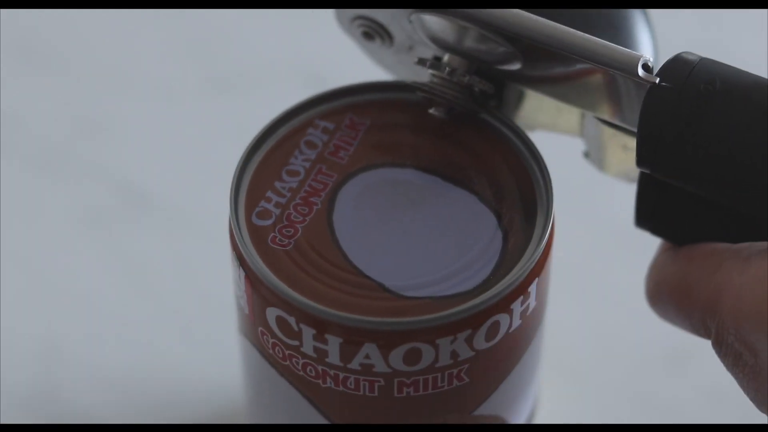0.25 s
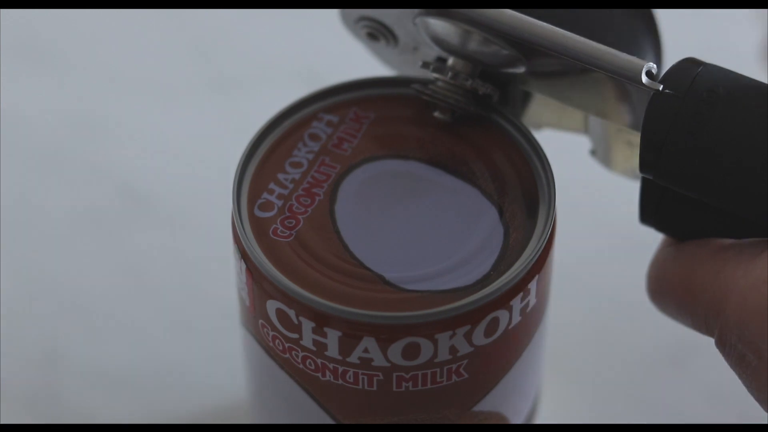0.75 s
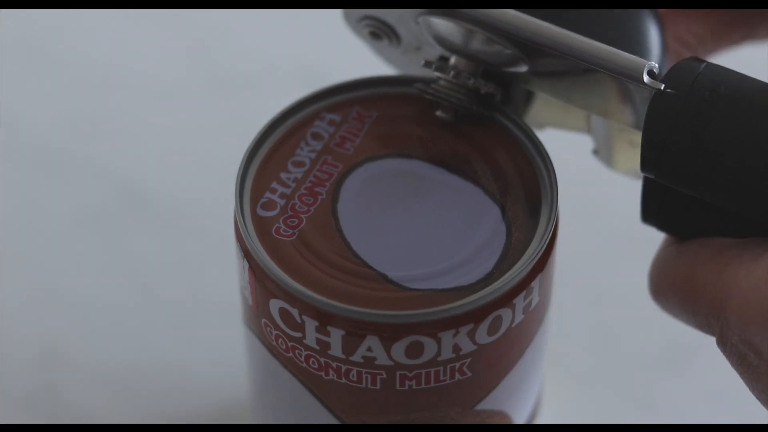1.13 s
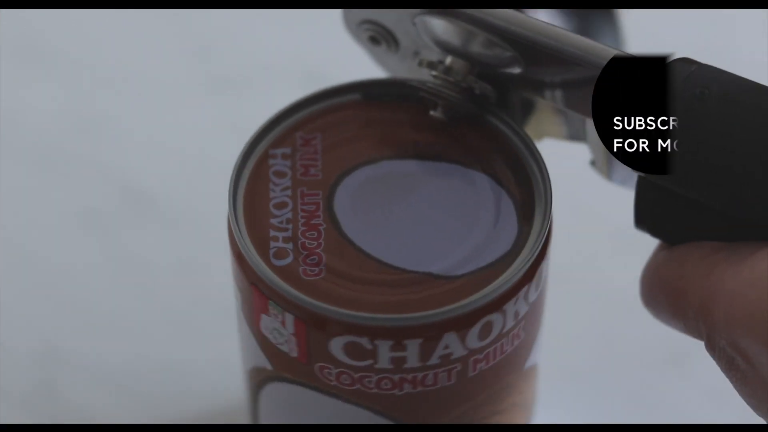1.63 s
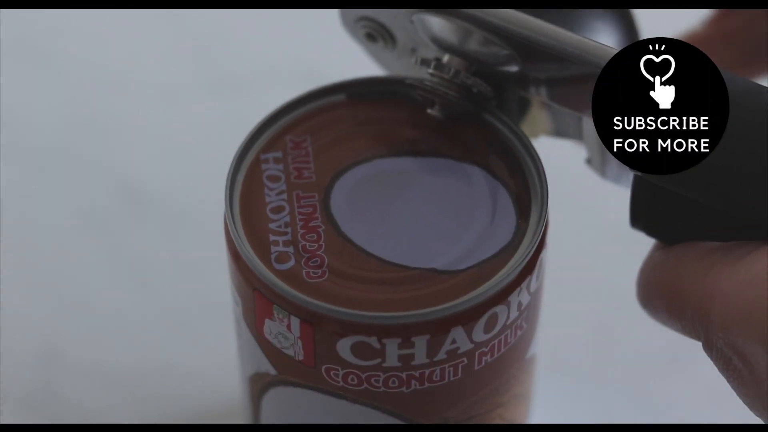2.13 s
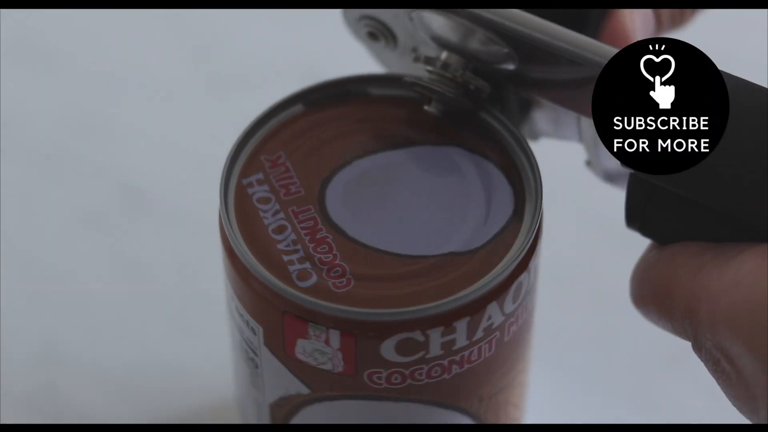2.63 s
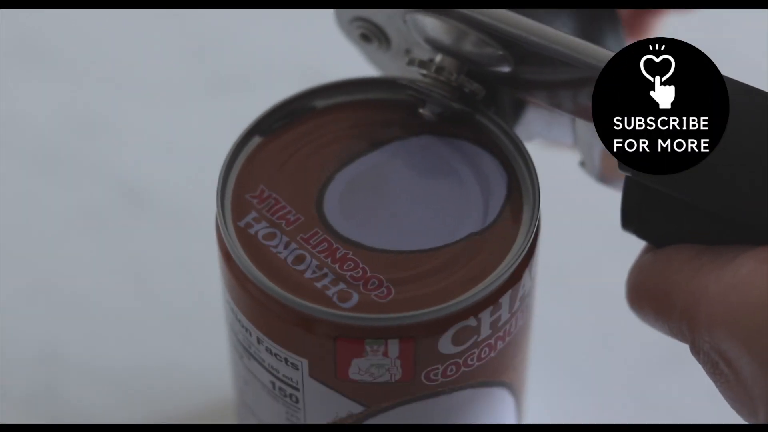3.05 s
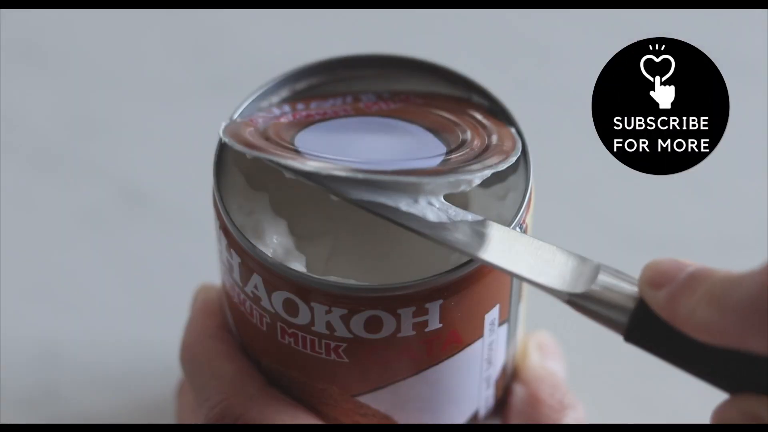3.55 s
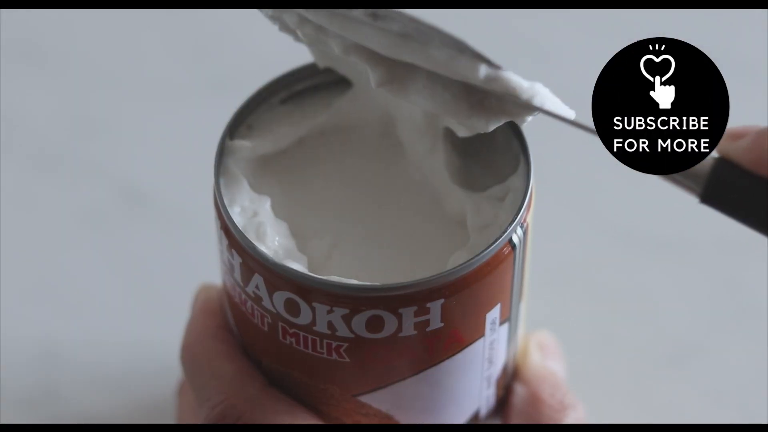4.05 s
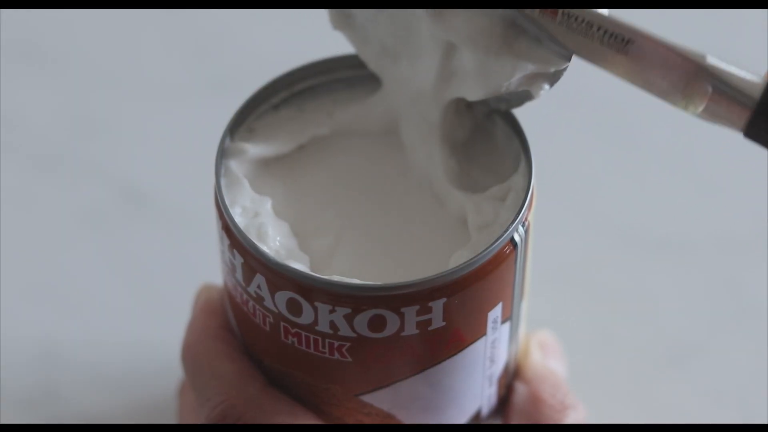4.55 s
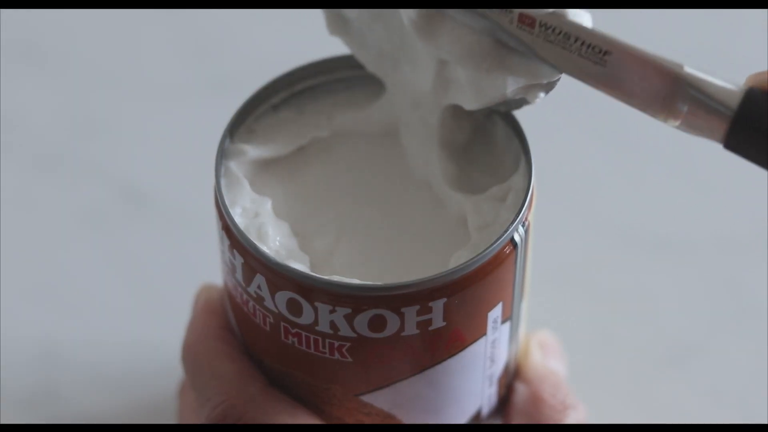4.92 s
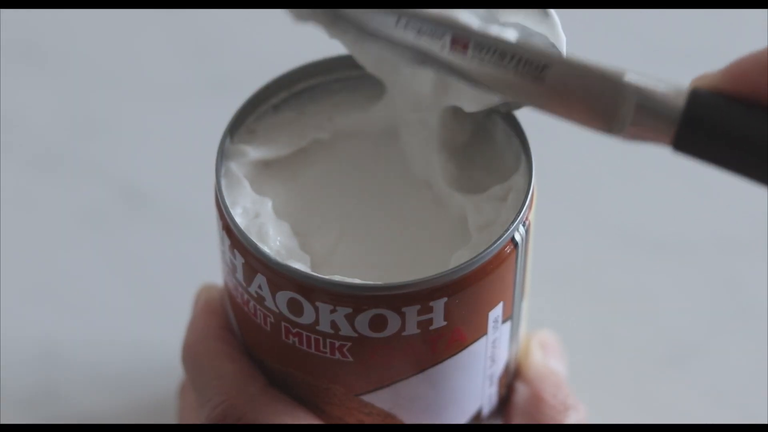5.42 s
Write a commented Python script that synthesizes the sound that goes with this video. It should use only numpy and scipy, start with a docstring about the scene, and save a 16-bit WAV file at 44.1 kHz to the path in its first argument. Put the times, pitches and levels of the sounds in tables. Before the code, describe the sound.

A close recording in a small, hard kitchen, with quiet room tone and a faint, low, wavering appliance hum throughout. From 0 to 0.4 s hands shift and lightly knock a full tin. At 0.43 s the can opener punches the lid: a very loud, sharp multi-stage metal snap with a soft low thump, clipping briefly and leaving a short bright echo. A light handling knock comes at 1.1 s. From 1.4 to 1.8 s the first turn starts with a hard clack, then crunches and rasps. Between 1.85 and 2.3 s steel hisses and rubs, with a tiny falling squeak near 2.07 s. Two more grinding turns follow at 2.5-2.8 and 2.84-3.1 s, with ticks. A knife slides in around 3.1-3.35 s, with a tin knock; from 3.45 to 3.9 s it slips and scrapes, ringing the bending lid. Soft, damp, faint rubs and small ticks continue until about 5.5 s.

```python
"""Over a faint wavering appliance hum, hands shift and knock a full tin on a counter in a small hard kitchen.
A hand can opener punches the lid with a loud snap, then three crank turns grind round the rim: rough noise
through ringing tin and steel. Between turns, filtered noise hisses as steel rubs, and a sliding tone squeaks.
A table knife slides under the rim, slips and scrapes on the ringing lid, then lifts it with soft damped rubs.
Every metal sound also excites decaying sparse echoes, the kitchen's ring."""
import sys
import numpy as np
from scipy import signal
from scipy.fft import rfft, irfft, next_fast_len
from scipy.io import wavfile
from scipy.ndimage import uniform_filter1d

SR = 44100
rng = np.random.default_rng(int(sys.argv[2]) if len(sys.argv) > 2 else 0)


def put_to_file(sound):
    """Save the sound as 16-bit audio at rate SR, in the file named by the first command-line argument."""
    columns = np.atleast_2d(sound).T  # one column per channel
    safe = np.clip(columns, -1, 1)
    whole_steps = np.round(safe * 32767)
    wavfile.write(sys.argv[1], SR, whole_steps.astype(np.int16))


N = 250047  # samples, 5.67 s


def gain_of(db):
    """Decibels to an amplitude factor."""
    return 10 ** (np.asarray(db) / 20)


def evened(x):
    """Scales to rms 1."""
    return x / np.sqrt(np.mean(x ** 2) + 1e-20)


def peaked(sound, db):
    """Sets the peak level."""
    return gain_of(db) * sound / abs(sound).max()


def add(mix, start_s, sound):
    """Places a sound in the mix, cut off at the end."""
    part = mix[round(start_s * SR):][:len(sound)]
    part += sound[:len(part)]


def read(points, hz):
    """Reads a (pitch_hz, value) table on a log frequency axis."""
    point_hz, value = np.transpose(points)
    return np.interp(np.log(hz + 1), np.log(point_hz + 1), value)


def coloured(x, points):
    """Filters x by the curve of a (pitch_hz, level_db) table."""
    size = next_fast_len(len(x))
    gain = gain_of(read(points, np.fft.rfftfreq(size, 1 / SR)))
    return irfft(rfft(x, size) * gain, size)[:len(x)]


def curve(rows, column, outside):
    """One table column drawn as straight lines over the whole scene."""
    rows = np.array(rows)
    return np.interp(np.arange(N) / SR, rows[:, 0], rows[:, column], outside, outside)


def level(tables, column):
    """The summed gain of several level curves, silent outside them, lightly smoothed."""
    total = sum(gain_of(curve(rows, column, -140)) for rows in tables)
    return uniform_filter1d(total, size=200)


def strokes(rows, column, rise_s, sag_db, fall_s):
    """Each stroke swells from 20 dB down, sags while it is held, and fades by 20 dB."""
    curves = []
    for row in rows:
        start_s, length_s = row[:2]
        release_s = start_s + max(length_s, 1.1 * rise_s)
        corners_s = (start_s, start_s + rise_s, release_s, release_s + fall_s)
        curves.append(np.c_[corners_s, row[column] + np.array([-20, 0, sag_db, sag_db - 20])])
    return level(curves, column=1)


def resonate(x, hz, width_hz):
    """A resonance of peak gain 1: shifts the (possibly moving) pitch to zero, smooths, and shifts back."""
    turn = np.exp(2j * np.pi * np.cumsum(hz * np.ones(len(x))) / SR)
    pole = np.exp(-np.pi * width_hz / SR)
    smooth = signal.lfilter([1 - pole], [1, -pole], x / turn + 1e-18)
    return 2 * (turn * smooth).real


def ring(modes):
    """Impulse response of a struck body, energy 1; neighbouring modes start in opposite senses."""
    t = np.arange(SR // 8) / SR
    out = np.zeros(len(t))
    for k, (hz, db, t60_s) in enumerate(modes):
        decay = gain_of(db - 60 * t / max(t60_s, .002))
        out += (-1) ** k * decay * np.sin(2 * np.pi * hz * t)
    return out / np.linalg.norm(out)


def blow(length_s):
    """A short rough push: quick rise, dying noisy chatter."""
    u = np.arange(SR // 30) / SR / max(length_s, .0003)
    return u * np.exp(-2 * u) * rng.standard_normal(len(u))


def firm(length_s, chatter):
    """A blow led by a sharp first contact."""
    push = chatter * peaked(blow(length_s), 0)
    push[0] += 1
    return push


def softened(push, contact_s):
    """A longer contact smooths the push and leaves the high modes quiet."""
    u = np.arange(120) / SR / max(contact_s, .00002) - 2
    return np.convolve(push, np.exp(-u ** 2))


def grit(per_s, spread_db, bed):
    """Stick-slip: sparse uneven snaps over a fine noise bed."""
    snaps = gain_of(spread_db * np.minimum(rng.exponential(1, N), 4))
    snaps *= rng.random(N) < per_s / SR
    return evened(snaps * rng.choice([-1., 1.], N)) + bed * rng.standard_normal(N)


# room tone spectrum, relative: pitch_hz [Hz], level_db [dB per Hz]
AIR = [(12, -55), (20, -27.5), (59, -13), (90, -22.5), (122, -10), (175, -16.5), (213, -10), (323, -17.5),
       (2090, -25), (4680, -29.5), (7110, -29.5), (7720, -32), (15500, -33.5)]
AIR_DB = -75.5  # rms of the room tone
# appliance drone, balance of its bands: pitch_hz [Hz], width_hz [Hz], level_db [dB]
HUM = [(118, 41, -81.5), (212.5, 30, -76)]
# drone and low air level, which wavers; the background level changes after 3.2 s: time_s [s], level_db [dB rms]
HUM_SWELL = [(0, -67), (.42, -67.5), (1, -67.5), (1.5, -62), (2, -67), (2.4, -68), (2.8, -70), (3.2, -70),
             (3.8, -67.5), (4.5, -72.5), (5.67, -71.5)]


def air():
    """Room tone as shaped noise, and an appliance drone of narrow noise bands that wavers in level."""
    drone = sum(gain_of(db) * evened(resonate(rng.standard_normal(N), hz, width_hz))
                for hz, width_hz, db in HUM)
    low = resonate(resonate(rng.standard_normal(N), 150, 160), 150, 160)
    wavering = evened(drone + gain_of(-81) * evened(low))
    swell = gain_of(curve(HUM_SWELL, column=1, outside=-75))
    return swell * wavering + gain_of(AIR_DB) * evened(coloured(rng.standard_normal(N), AIR))


# modes of the full tin on the counter, relative levels: pitch_hz [Hz], level_db [dB], t60_s [s]
TIN = [(255, -16, .07), (305, -12, .05), (404, -9.5, .05), (502, -6.5, 0.041), (612, -5, 0.031),
       (825, -2.5, .028), (1092, -6, 0.017), (1316, -6.5, 0.024), (1620, -5, .014), (1960, -1.5, 0.007),
       (2300, -4, .01), (2690, -8, 0.014)]


def crunch(gain):
    """Tearing sheet shakes the tin in small soft lumps that ring its modes."""
    lumps = softened(grit(per_s=400, spread_db=3.5, bed=0.27), .00022)[:N]
    return gain * evened(signal.oaconvolve(lumps, ring(TIN))[:N])


# hands shift and brush the tin: start_s [s], length_s [s], crunch_db [dB], rasp_db [dB]
SHIFTS = [(0, 0.087, -70, -73.5), (.07, 0.084, -62, -72.5), (.17, 0.27, -71.5, -83.5),
          (.98, 0.36, -68.5, -75), (1.82, 0.19, -68.5, -81), (2.06, 0.052, -61, -69),
          (2.14, 0.17, -69, -89.5), (3.18, .05, -63, -73), (3.24, 0.13, -62.5, -75), (4.0, 0.16, -68, -88),
          (4.63, .06, -66, -88), (4.73, 0.051, -64, -90)]
SHIFT_RISE_S, SHIFT_SAG_DB, SHIFT_FALL_S = .03, -5, .06
# level curves of three crank turns that tear the lid: time_s [s], tin_crunch_db [dB], rim_rasp_db [dB]
TURNS = [
    [(1.33, -72.5, -82), (1.398, -60, -70), (1.412, -46, -56), (1.5, -54, -69), (1.64, -58.5, -62.5),
     (1.75, -53, -64.5), (1.8, -56.5, -65), (1.83, -76, -85)],
    [(2.35, -69.5, -90), (2.5, -62.5, -67.5), (2.61, -53.5, -66), (2.77, -61, -70), (2.828, -63.5, -74)],
    [(2.828, -63, -72), (2.842, -49.5, -63.5), (2.96, -52.5, -63.5), (3.02, -55.5, -67), (3.07, -73, -75),
     (3.12, -78, -76)],
]
# wheel on the rim, relative spectrum: pitch_hz [Hz], level_db [dB per Hz]
RASP = [(880, -31.5), (1500, -0.5), (2330, -7.5), (3120, -7.5), (4610, -13.5), (4940, -13), (5660, -16.5),
        (8700, -15), (12100, -26), (15500, -29.5)]


def grind():
    """Handling and cutting are heard low through the tin and high as a fine stick-slip rasp."""
    rasp = coloured(grit(per_s=480, spread_db=3.5, bed=1.2), RASP)
    low = level(TURNS, 1) + strokes(SHIFTS, 2, SHIFT_RISE_S, SHIFT_SAG_DB, SHIFT_FALL_S)
    high = level(TURNS, 2) + strokes(SHIFTS, 3, SHIFT_RISE_S, SHIFT_SAG_DB, SHIFT_FALL_S)
    return crunch(low) + high * evened(rasp)


# modes of the steel wheel and arms, relative levels: pitch_hz [Hz], level_db [dB],
# t60_s [s] (ring() holds it to at least 2 ms)
STEEL = [(3000, -5.5, 0.0045), (3460, -3, 0.0058), (3970, -1, 0.0051), (4680, -5.5, .004),
         (5000, -5.5, 0.0059), (5700, -6.5, 0.0035), (6560, -4, 0.0026), (7520, -5.5, 0.0039),
         (8600, -2, 0.0032), (9670, -5, .005), (10940, -5.5, 0.001), (12200, -7, 0.002),
         (13260, -6.5, 0.0018), (14800, -9, 0.0022)]


def knocks(blows):
    """Every blow rings tin and steel; row 0 is the near sound, rows 1-3 feed three echo tails.

    The room gets each blow's plain ring at equal energy, in one of three echo tails by turns."""
    near, far = np.zeros(N), np.zeros((3, N))
    for k, (start_s, tin_db, steel_db, length_s, contact_s) in enumerate(blows):
        tin_push = softened(firm(length_s, .2), contact_s)
        tin = peaked(signal.fftconvolve(tin_push, ring(TIN)), tin_db)
        steel = peaked(signal.fftconvolve(blow(length_s), ring(STEEL)), steel_db)
        plain_tin = softened(ring(TIN), contact_s)
        plain_tin /= np.linalg.norm(plain_tin)
        for heard, body in (tin, plain_tin), (steel, ring(STEEL)):
            add(near, start_s, heard)
            add(far[k % 3], start_s, np.linalg.norm(heard) * body)
    return np.vstack([near, far])


# knocks and ticks while cutting and handling, peak levels:
# start_s [s], tin_db [dB], steel_db [dB], contact_s [s]
KNOCKS = [(0.093, -39, -67, 0.00032), (1.091, -63, -54, 0.00012), (1.109, -38.5, -66, 0.00031),
          (1.402, -19.5, -38, 0.00011), (1.412, -57, -47, .00015), (1.434, -31, -60, .00018),
          (1.477, -37, -57, .00015), (1.533, -34.5, -60, 0.00021), (1.624, -37, -49, 0.00017),
          (1.727, -40, -51, .00012), (1.769, -43.5, -53, .00014), (2.487, -47.5, -64, .00014),
          (2.567, -41.5, -42.5, .00015), (2.685, -47.5, -49.5, .00015), (2.836, -43, -55, .00015),
          (2.877, -50, -58, 0.00016), (2.894, -47, -56, .00013), (2.922, -36, -44.5, .00014),
          (2.947, -46, -50, 0.00019), (3.002, -39.5, -47.5, .00011), (3.054, -51, -55, .00015),
          (3.104, -56.5, -57, 0.00018), (3.123, -48, -43, .00013), (3.1884, -32, -59, .00025),
          (3.346, -55.5, -52, .00015), (4.009, -56, -54, 0.0001), (4.173, -54, -77, .00015),
          (4.258, -48.5, -57, 0.00016), (4.294, -54.5, -68, .00013), (4.753, -53.5, -69, .00025),
          (5.03, -52.5, -61, .00013), (5.054, -58, -66, .00013), (5.532, -66.5, -58, 0.00016)]
# time scale of a -45 dB tin blow; harder blows last longer
KNOCK_S, LONGER_S_PER_DB = 0.0014, .00005


def handling_knocks():
    """Light contacts strike tin and steel, the harder ones for longer."""
    blows = []
    for start_s, tin_db, steel_db, contact_s in KNOCKS:
        length_s = KNOCK_S + LONGER_S_PER_DB * (tin_db + 45)
        blows.append((start_s, tin_db, steel_db, length_s, contact_s))
    return knocks(blows)


# the wheel punches through in stages, peak levels before the bass cut:
# start_s [s], tin_db [dB], steel_db [dB], length_s [s] (time scale of the blow), contact_s [s]
SNAP = [(.4256, -0.5, 5.5, 0.001, 0.000057), (0.4285, -8.5, 3.5, 0.0023, 0.000046),
        (.4305, 4, -6.5, 0.0011, .00006), (.4450, -11, -20.5, 0.0025, .00006)]
LID_HZ = 580  # the punch shakes the lid more than the deep modes of the full tin


def snap():
    """The punch rings tin and steel in stages, with the deep modes turned down by a gentle high-pass."""
    return signal.lfilter(*signal.butter(1, LID_HZ, "high", fs=SR), knocks(SNAP))


# a short soft low thump under the snap: start_s [s], peak_db [dB], length_s [s] (time to the peak)
THUMP = (.4275, -20.5, .0015)


def thump():
    """One soft low push, a smooth rise and decay."""
    out = np.zeros(N)
    start_s, peak_db, length_s = THUMP
    u = np.arange(SR // 10) / SR / length_s
    add(out, start_s, peaked(u * np.exp(-u), peak_db))
    return out


# steel slides on steel as the grip is reset:
# start_s [s], length_s [s], hiss_db [dB], hiss_centre_hz [Hz], wheel_ring_db [dB]
RUBS = [(1.87, 0.059, -66, 9185, -67.5), (2.005, 0.068, -69, 9910, -83), (2.07, 0.038, -67, 9400, -80),
        (2.128, 0.024, -76, 9500, -66), (2.175, 0.041, -71, 9200, -79), (2.22, 0.031, -75, 9250, -79),
        (2.3, .055, -88, 9000, -81)]
RUB_RISE_S, RUB_SAG_DB, RUB_FALL_S = .02, -1.5, .015
# the crank pivot squeaks: start_s [s], length_s [s], level_db [dB] (added to each partial's level)
SQUEAK = [(2.068, 0.045, -66)]
# squeak partials: pitch_ratio [times the pitch], level_db [dB]
SQUEAK_TONES = [(1, 3), (2, 5.5), (6.2, -4)]
SQUEAK_HZ, SQUEAK_SAG_HZ_PER_S = 1250, 500  # pitch at the start, and its fall


def rubs():
    """Smooth sliding: a high moving noise band, the ring of the wheel, and one rough falling squeak."""
    hiss, t = rng.standard_normal(N), np.arange(N) / SR
    middles_s = [row[0] + row[1] / 2 for row in RUBS]
    centre_hz = np.interp(t, middles_s, [row[3] for row in RUBS])
    narrow, broad = resonate(hiss, centre_hz, 350), resonate(hiss, centre_hz, 3470)
    high = evened(narrow) + 0.93 * evened(broad)
    wheel = resonate(hiss, 3880, 120)
    wander_hz = 25 * evened(uniform_filter1d(hiss, size=60))
    pitch_hz = SQUEAK_HZ - SQUEAK_SAG_HZ_PER_S * (t - SQUEAK[0][0]) + wander_hz
    turns = np.cumsum(pitch_hz) / SR
    squeak = sum(gain_of(db) * np.sin(2 * np.pi * ratio * turns) for ratio, db in SQUEAK_TONES)
    loud = strokes(RUBS, 2, RUB_RISE_S, RUB_SAG_DB, RUB_FALL_S)
    rung = strokes(RUBS, 4, RUB_RISE_S, RUB_SAG_DB, RUB_FALL_S)
    squeaking = strokes(SQUEAK, column=2, rise_s=.015, sag_db=0.0, fall_s=.015)
    return loud * evened(high) + rung * evened(wheel) + squeaking * squeak


# the blade slides in under the rim before it lifts: start_s [s], length_s [s], ring_db [dB], high_hiss_db [dB]
SLIDE = [(3.115, 0.029, -64, -80), (3.13, .04, -76, -63.5), (3.225, .025, -74, -62.5),
         (3.245, 0.048, -62.5, -92), (3.3, .1, -73, -98)]
SLIDE_RISE_S, SLIDE_SAG_DB, SLIDE_FALL_S = 0.014, -3.5, 0.029
# the sliding blade rings, balance of its bands: pitch_hz [Hz], width_hz [Hz], level_db [dB]
SLIDE_BANDS = [(1496.4, 190, 3.5), (1749, 81, -9), (2996, 480, 1), (4033, 45, -18), (4600, 43, -18),
               (9175, 86, -20.5)]


def slide():
    """A smooth metal-on-metal hiss and a few noise-driven ringing bands."""
    hiss = rng.standard_normal(N)
    bands = sum(gain_of(db) * evened(resonate(hiss, hz, width_hz)) for hz, width_hz, db in SLIDE_BANDS)
    high = resonate(resonate(hiss, 10000, 6600), 10000, 6600)
    rung = strokes(SLIDE, 2, SLIDE_RISE_S, SLIDE_SAG_DB, SLIDE_FALL_S)
    loud = strokes(SLIDE, 3, SLIDE_RISE_S, SLIDE_SAG_DB, SLIDE_FALL_S)
    return rung * evened(bands) + loud * evened(high)


# blade on tin, relative spectrum: pitch_hz [Hz], level_db [dB per Hz]
SCRATCH = [(1290, -30.5), (2200, -2), (2510, -6.5), (3500, -3.5), (5100, -9.5), (5360, -12), (6360, -5),
           (7070, -10), (11200, -13.5), (12400, -22), (15500, -27)]
# the knife rings, relative levels: pitch_hz [Hz], width_hz [Hz], level_db [dB]
BLADE = [(3070, 220, -6), (4154, 140, -8), (5430, 180, -5.5), (6560, 300, -15), (7750, 390, -10),
         (11150, 310, -10.5)]


def scratch(x):
    """Blade on tin: a broad scratch with the ring of the knife."""
    blade = sum(gain_of(db) * resonate(x, hz, width_hz) for hz, width_hz, db in BLADE)
    return coloured(x, SCRATCH) + blade


# the knife drags in two strokes: time_s [s], tin_crunch_db [dB] (before its resonance),
# lid_ring_db [dB], scratch_db [dB]
DRAG = [
    [(3.448, -70.5, -75, -85), (3.456, -46.5, -55, -77), (3.49, -47, -45.5, -78), (3.515, -55, -61, -76),
     (3.55, -48.5, -53, -71), (3.635, -57, -61, -72), (3.67, -55, -58, -83), (3.706, -63, -77, -90)],
    [(3.706, -63, -77, -90), (3.714, -59, -39, -41), (3.738, -51, -52, -73), (3.76, -49.5, -46.5, -52),
     (3.845, -56.5, -51, -62), (3.86, -59.5, -64, -90), (3.92, -72, -83, -92)],
]
# pitch of the lid as it bends: time_s [s], pitch_hz [Hz]
BEND = [(3.52, 1410), (3.56, 1680), (3.69, 1760), (3.72, 1620), (3.9, 1660)]
# the knife slips on the cut edge, peak levels:
# start_s [s], lid_ring_db [dB], lid_pitch_hz [Hz], scratch_db [dB], length_s [s] (time scale of the slip)
SLIPS = [(3.4544, -36, 1397, -49, 0.0031), (3.4625, -25, 1383, -30, .005), (3.4727, -29, 1414, -37, 0.0033),
         (3.4844, -38, 1380, -55, 0.0028), (3.5181, -32.5, 1433, -42, .0025),
         (3.5316, -36, 1360, -31, .0025), (3.5548, -31, 1716, -31.5, 0.0053),
         (3.574, -55, 1710, -48, 0.0011), (3.5887, -35.5, 1460, -33.5, .003), (3.605, -48, 1330, -47, .004),
         (3.6218, -39, 1447, -48, 0.0022), (3.6445, -28, 1794, -39, .0026), (3.6624, -47, 1820, -53, .003),
         (3.711, -30.5, 1790, -33.5, .0046), (3.7344, -40.5, 1430, -50, .004),
         (3.7446, -38.5, 1480, -32.5, .012), (3.7666, -37.5, 1850, -33, 0.0026),
         (3.8003, -39, 1690, -38, 0.0013), (3.8081, -39, 1650, -39, .004),
         (3.8183, -39.5, 1440, -36.5, 0.0021)]


def knife():
    """The loose lid rings at a pitch that shifts as the blade bends it; the edge scratches."""
    out = np.zeros(N)
    for start_s, lid_db, hz, scratch_db, length_s in SLIPS:
        push = firm(length_s, 0.32)
        lid = resonate(resonate(push, hz, 125), hz, 260) + 0.38 * resonate(push, hz / 2, 123)
        add(out, start_s, peaked(lid, lid_db))
        add(out, start_s, peaked(scratch(blow(length_s)), scratch_db))
    drag = grit(per_s=4600, spread_db=1.5, bed=1.06)
    dragged_lid = resonate(drag, curve(BEND, column=1, outside=None), 300)
    out += level(DRAG, column=2) * evened(dragged_lid)
    out += level(DRAG, column=3) * evened(scratch(drag))
    return out + resonate(crunch(level(DRAG, column=1)), 680, 860)


# the knife lifts the lid out of the cream: start_s [s], length_s [s], soft_rub_db [dB], airy_brush_db [dB]
LIFTS = [(3.995, .19, -65, -80), (4.23, .11, -68.5, -86), (4.36, .1, -77, -93), (4.47, .11, -72, -91),
         (4.61, 0.11, -66, -86), (4.73, 0.089, -71, -73.5), (4.83, 0.079, -76, -85), (4.94, .06, -70, -89),
         (5.02, 0.057, -64.5, -84), (5.1, .12, -79, -92)]
LIFT_RISE_S, LIFT_SAG_DB, LIFT_FALL_S = .025, -5, .05
LIFT_HZ, LIFT_WIDTH_HZ, BRUSH_HZ, BRUSH_WIDTH_HZ = 900, 1100, 2817, 3500


def lift():
    """A damped stick-slip rub in the wet lid with a fine brush above it."""
    rub = grit(per_s=610, spread_db=2.5, bed=.8)
    low = resonate(resonate(rub, LIFT_HZ, LIFT_WIDTH_HZ), LIFT_HZ, LIFT_WIDTH_HZ)
    brush = resonate(resonate(rub, BRUSH_HZ, BRUSH_WIDTH_HZ), BRUSH_HZ, BRUSH_WIDTH_HZ)
    soft = strokes(LIFTS, 2, LIFT_RISE_S, LIFT_SAG_DB, LIFT_FALL_S)
    airy = strokes(LIFTS, 3, LIFT_RISE_S, LIFT_SAG_DB, LIFT_FALL_S)
    return soft * evened(low) + airy * evened(brush)


# decay of the small hard kitchen: pitch_hz [Hz], t60_s [s]
KITCHEN = [(150, 0.13), (300, 0.53), (600, 0.39), (1200, 0.74), (4000, 0.59), (6000, 0.62), (9000, 0.41),
           (11500, .31), (15000, .28)]
KITCHEN_DB, KNIFE_ROOM_DB = -9.5, -14.5  # room send of blows and cutting; of rubs, knife and lift


def kitchen(x):
    """Sparse echoes of random sign, each band dying at its own speed; the tail has energy 1."""
    taps = np.zeros(SR)
    at = np.arange(400, SR - 20, 20)
    taps[at + rng.integers(0, 20, len(at))] = rng.choice([-1., 1.], len(at))
    hz, t, bands = signal.stft(taps, SR, nperseg=256)
    decay = gain_of(-60 * t / read(KITCHEN, hz)[:, None])
    tail = signal.istft(bands * decay, SR, nperseg=256)[1]
    return signal.fftconvolve(x, tail / np.linalg.norm(tail))[:N]


def scene():
    """All sources near the microphone, plus the room; small objects radiate little bass."""
    blows, *far = handling_knocks() + snap()
    cutting = grind()
    lifting = rubs() + slide() + knife() + lift()
    sent = gain_of(KITCHEN_DB) * cutting + gain_of(KNIFE_ROOM_DB) * lifting
    room = gain_of(KITCHEN_DB) * sum(kitchen(part) for part in far) + kitchen(sent)
    bass_cut = signal.butter(4, 225, "high", fs=SR, output="sos")
    metal = signal.sosfilt(bass_cut, blows + cutting + lifting + room)
    return (metal + thump() + air())[None]


EDGE_HZ = 15700  # upper band limit


def record(dry):
    """The snap overloads the input and clips; then a steep low-pass sets the band limit."""
    clipped = np.clip(dry, -1, 1)
    low_pass = signal.firwin(511, EDGE_HZ, window=("kaiser", 9), fs=SR)
    return signal.oaconvolve(clipped, low_pass[None], "same")


dry = scene()
out = record(dry)
put_to_file(out)
```